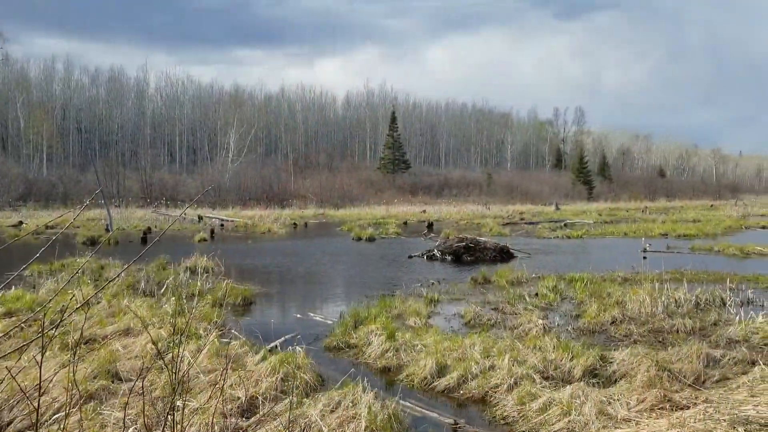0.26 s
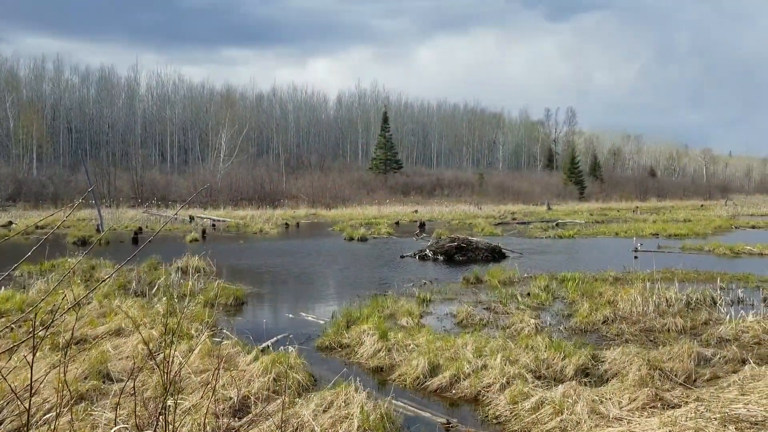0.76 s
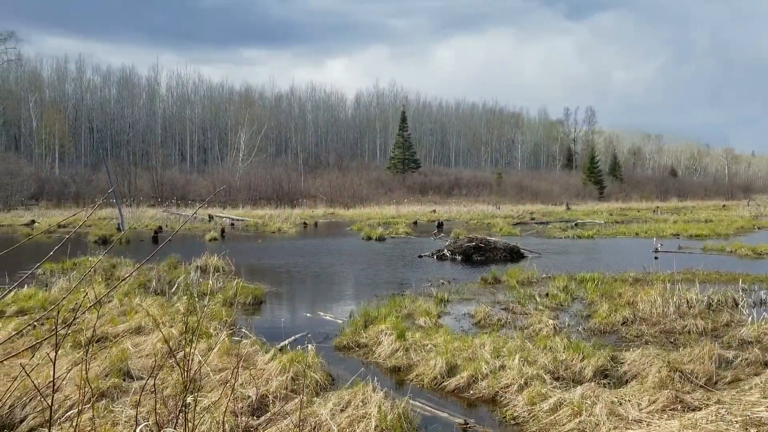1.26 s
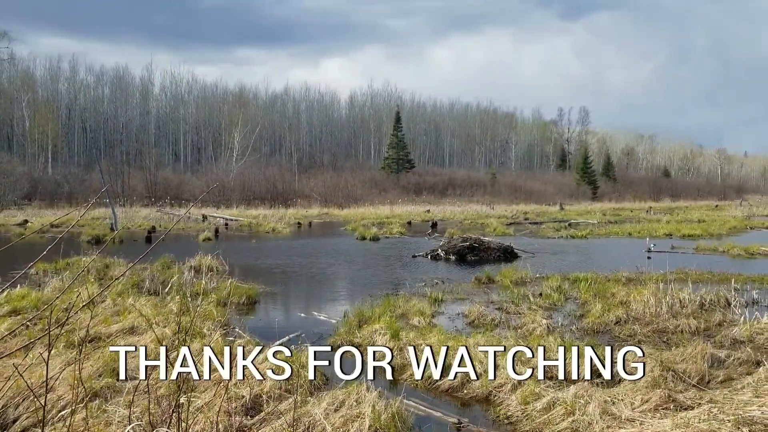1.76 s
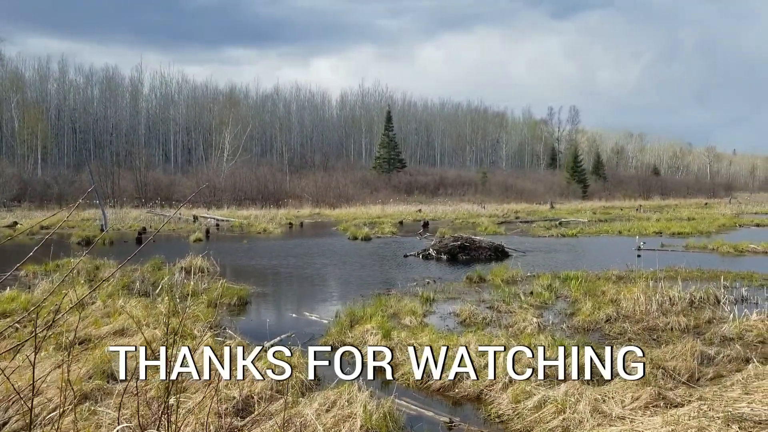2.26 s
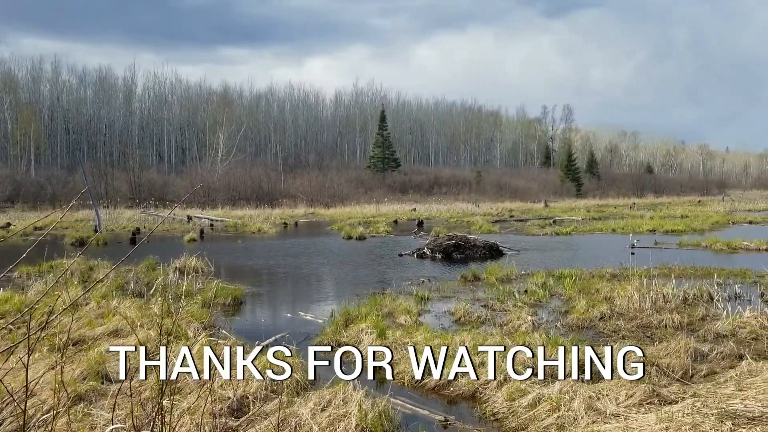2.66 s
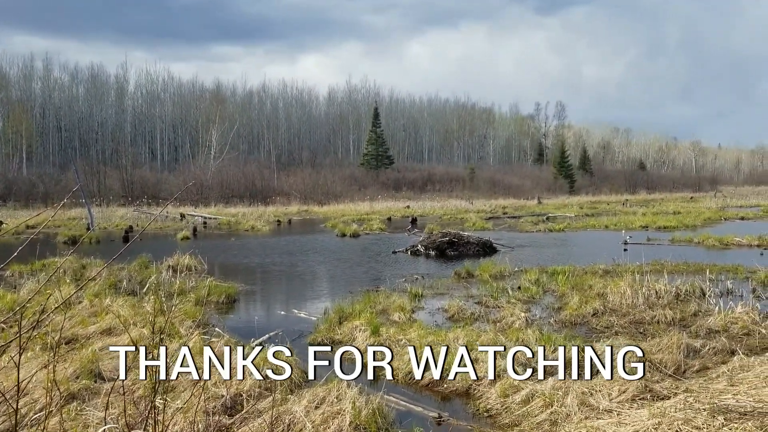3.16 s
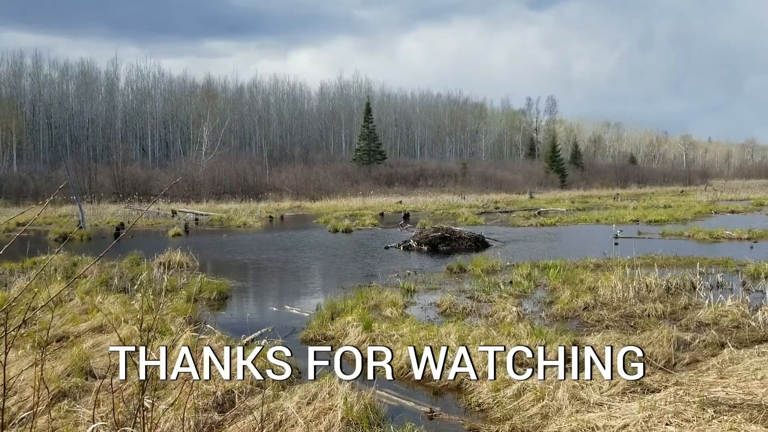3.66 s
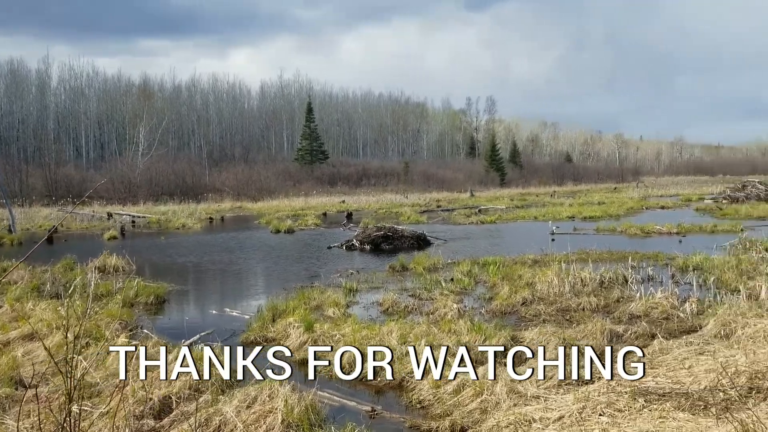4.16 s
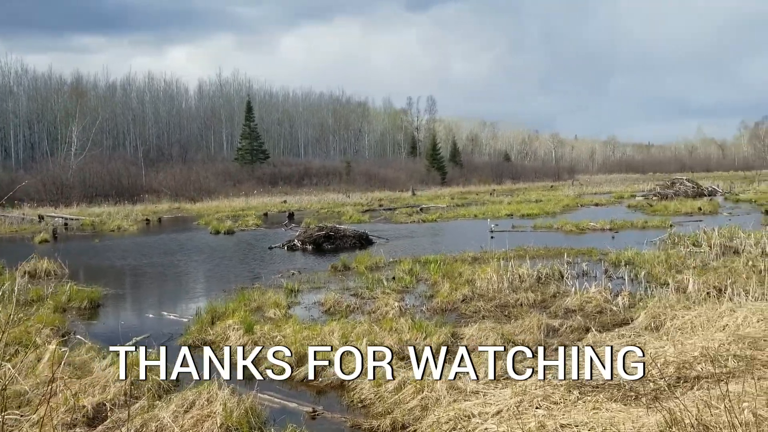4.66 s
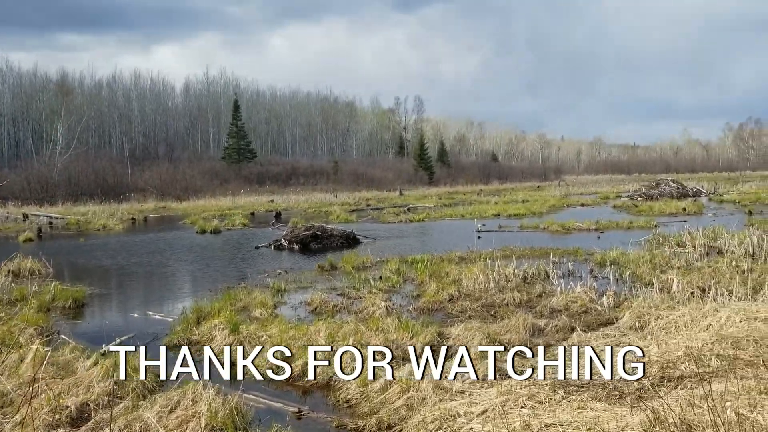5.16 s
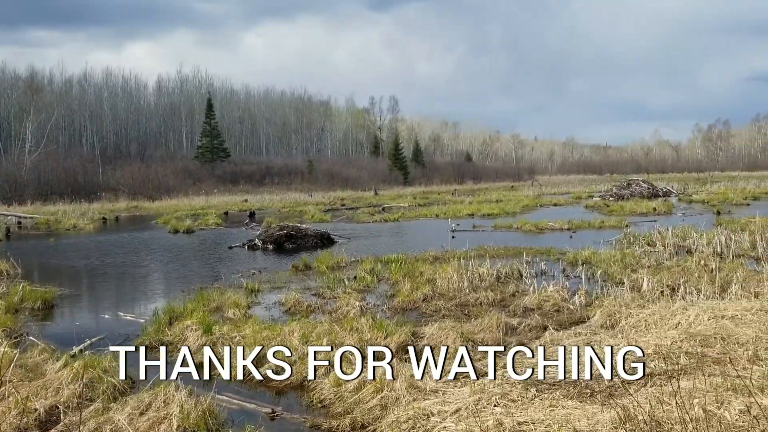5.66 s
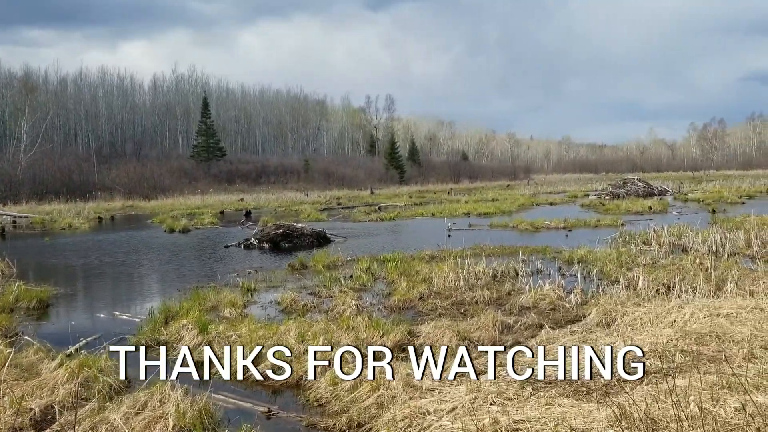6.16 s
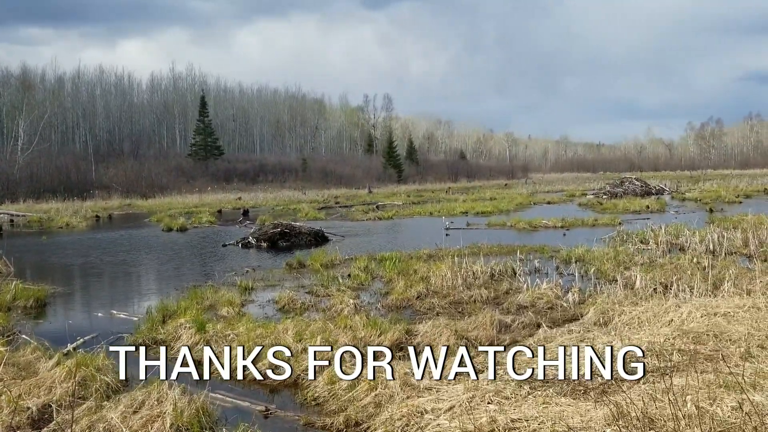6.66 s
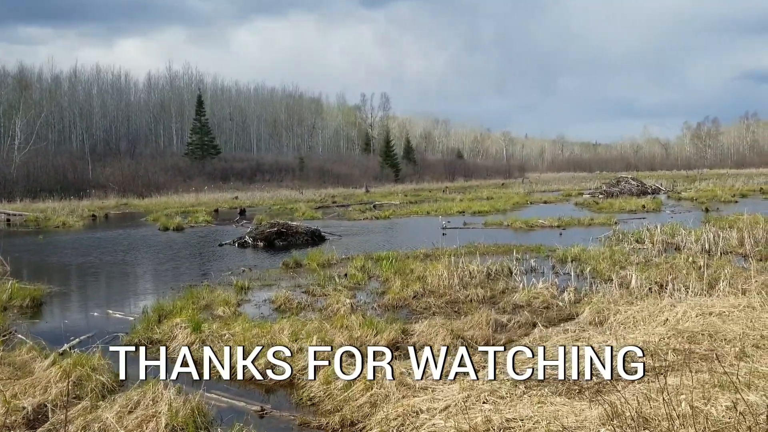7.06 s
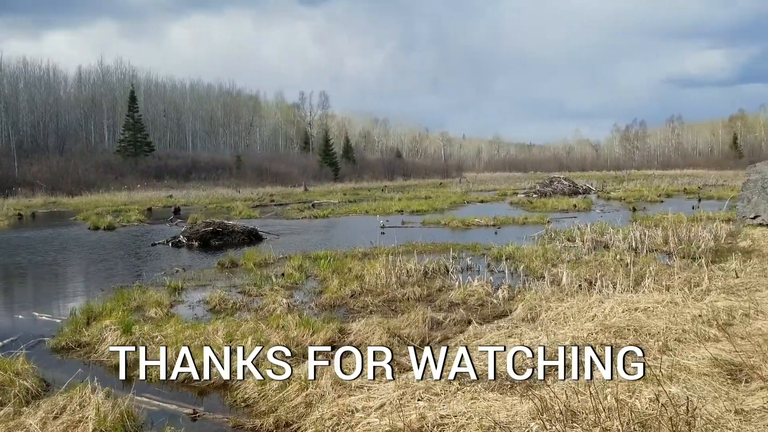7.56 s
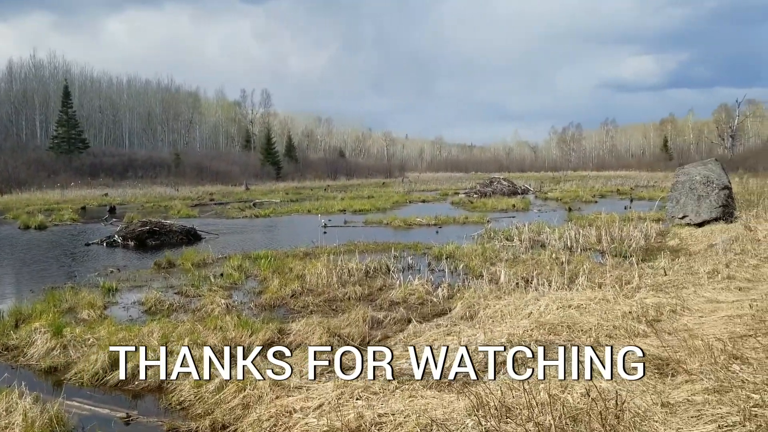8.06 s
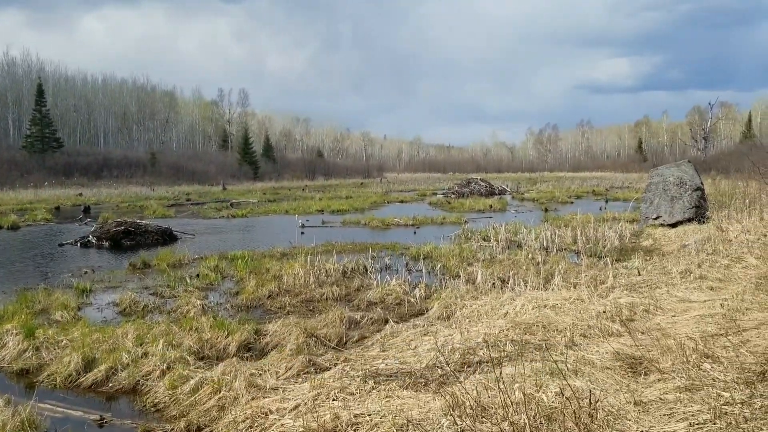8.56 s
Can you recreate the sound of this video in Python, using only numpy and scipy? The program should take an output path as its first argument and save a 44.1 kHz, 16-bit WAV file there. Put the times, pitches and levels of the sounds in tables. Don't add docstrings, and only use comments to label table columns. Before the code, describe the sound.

Dense chorus of tiny tree frogs peeping in high rising whistles over a marsh, with low wind gusts thumping the microphone and dry grass crackling.

```python
import sys
import numpy as np
from scipy import signal
from scipy.fft import rfft, irfft, next_fast_len
from scipy.io import wavfile
from scipy.ndimage import uniform_filter1d, map_coordinates

SR = 44100
rng = np.random.default_rng(int(sys.argv[2]) if len(sys.argv) > 2 else 0)


def volts_from_decibels(level):
    exponent = np.asarray(level, float) / 20
    return 10 ** exponent


def dump(signal):
    limited = np.clip(np.atleast_2d(signal).T, -1, 1)
    pcm = np.round(limited * 32767).astype(np.int16)
    wavfile.write(sys.argv[1], SR, pcm)


N = 389403


def unit(x):
    return x / np.sqrt(np.mean(x ** 2) + 1e-20)


def curves(rows):
    s, *columns = np.transpose(rows)
    return [np.interp(np.arange(N) / SR, s, column) for column in columns]


def wobble(rate):
    knots = rng.standard_normal((2, int(N * rate / SR) + 4))
    position = np.arange(N) * rate / SR
    return np.array([map_coordinates(k, [position]) for k in knots])


def coloured(x, spectrum):
    size = next_fast_len(N + 8192)
    hz, db = np.transpose(spectrum)
    bins_hz = np.fft.rfftfreq(size, 1 / SR)
    gain = volts_from_decibels(np.interp(np.log(bins_hz + 1), np.log(hz + 1), db))
    return unit(irfft(rfft(x, size) * gain, size)[..., :N])


def add_call(out, s, length, start_hz, end_hz, db, lead_us, pulses=0, pan_db=0, twist=0, partials=()):
    t = np.arange(int((length + 0.0073) * SR)) / SR
    u = (t - .004) / length
    bend = 0 if pulses else .3
    glide_hz = start_hz + (end_hz - start_hz) * (u + bend * u * (1 - u))
    turn = 2 * np.pi * np.cumsum(glide_hz) / SR

    attack = np.clip(t / 0.0085, 0, 1)
    release = np.clip((t[-1] - t) / 0.0061, 0, 1)
    shape = attack * release * volts_from_decibels(0.97 * (u + 0.5))
    if pulses:
        beat = pulses * (t + .0015 * np.sin(37 * t + start_hz))
        opening = np.clip(1.7 * (.45 - np.cos(2 * np.pi * beat)), 0, 1.4)
        shape = shape * opening * np.clip(.55 + 2 * u, 0, 1)
    flutter_db = 2.6 * np.interp(t, np.linspace(0, t[-1], 12), rng.standard_normal(12))

    side = np.array([[.5], [-.5]])
    cycles = 1 + lead_us * 1e-6 * (start_hz + end_hz) / 2
    sway = .04 * np.interp(t, np.linspace(0, t[-1], 5), rng.standard_normal(5))
    cycles = cycles + twist * (u - .5) + sway
    phase = turn + rng.uniform(0, 2 * np.pi) + side * 2 * np.pi * cycles
    tone = np.sin(phase) + sum(volts_from_decibels(level) * np.sin(k * phase) for k, level in partials)
    call = np.sqrt(2) * volts_from_decibels(db + side * pan_db) * shape * volts_from_decibels(flutter_db) * tone

    seat = out[:, max(round((s - .004) * SR), 0):][:, :len(t)]
    seat += call[:, :seat.shape[1]]


# start in seconds, length in seconds, start pitch in Hz,
# end pitch in Hz, level in dB.
LOUD_REEDS = [(0.702, 0.168, 2640.0, 3040.0, -37.3), (1.692, 0.18, 2680.0, 3160.0, -37.4),
              (2.371, 0.108, 2600.0, 2960.0, -40.6), (2.566, 0.084, 2760.0, 3080.0, -40.1),
              (3.201, 0.096, 2700.0, 2940.0, -47.8), (3.388, 0.048, 3220.0, 3340.0, -53.7),
              (3.919, 0.168, 2760.0, 3200.0, -42.9), (4.015, 0.18, 2700.0, 3100.0, -48.4),
              (4.302, 0.096, 2660.0, 2940.0, -48.3), (6.126, 0.048, 3100.0, 3260.0, -51.8),
              (7.89, 0.12, 2960.0, 3240.0, -52.2)]
BUSY_REEDS = [(0.004, 0.06, 2880.0, 3080.0, -48.7), (0.104, 0.06, 2920.0, 3040.0, -48.7),
              (0.255, 0.096, 3020.0, 3220.0, -50.4), (0.447, 0.06, 3080.0, 3320.0, -51.6),
              (0.714, 0.084, 2940.0, 3260.0, -48.9), (0.722, 0.12, 2600.0, 2880.0, -46.4),
              (0.81, 0.06, 3020.0, 3140.0, -45.1), (0.846, 0.12, 2620.0, 2900.0, -49.8),
              (1.002, 0.108, 2920.0, 3320.0, -46.9), (1.544, 0.096, 2960.0, 3240.0, -46.9),
              (1.772, 0.072, 2800.0, 3000.0, -44.2), (1.88, 0.12, 2880.0, 3320.0, -45.0),
              (1.892, 0.072, 2640.0, 2840.0, -46.0), (2.291, 0.084, 3000.0, 3160.0, -47.6),
              (2.379, 0.096, 2540.0, 2820.0, -50.2), (2.546, 0.06, 3120.0, 3320.0, -51.4),
              (2.973, 0.06, 2660.0, 2820.0, -51.9), (3.065, 0.084, 2800.0, 3240.0, -47.5),
              (3.257, 0.048, 3200.0, 3360.0, -47.5), (3.572, 0.096, 2720.0, 3040.0, -46.7),
              (3.632, 0.084, 2700.0, 2900.0, -48.1), (3.648, 0.144, 2840.0, 3200.0, -42.2),
              (4.151, 0.168, 2800.0, 3240.0, -47.1), (4.171, 0.06, 2960.0, 3240.0, -48.3),
              (4.282, 0.12, 2780.0, 3180.0, -47.4), (4.282, 0.12, 2680.0, 3080.0, -41.6),
              (4.438, 0.132, 2940.0, 3300.0, -43.4), (4.709, 0.084, 2980.0, 3300.0, -48.4),
              (5.308, 0.084, 2920.0, 3280.0, -46.4), (5.4, 0.156, 3020.0, 3340.0, -49.8),
              (6.066, 0.048, 3140.0, 3300.0, -52.3), (6.733, 0.096, 2980.0, 3260.0, -47.7),
              (7.363, 0.048, 2840.0, 2960.0, -49.5), (8.58, 0.12, 2600.0, 2920.0, -47.0)]
LEFT_REEDS = [(0.838, 0.18, 2720.0, 3080.0, -43.2), (1.006, 0.072, 3160.0, 3320.0, -47.6),
              (1.385, 0.18, 2640.0, 3120.0, -42.3), (1.692, 0.048, 3120.0, 3360.0, -51.2),
              (1.848, 0.132, 2560.0, 3000.0, -40.2), (2.011, 0.12, 2820.0, 3300.0, -44.7),
              (2.111, 0.048, 3100.0, 3260.0, -42.9), (2.47, 0.048, 3120.0, 3320.0, -49.6),
              (2.618, 0.12, 2720.0, 3040.0, -42.8), (2.706, 0.132, 2760.0, 3160.0, -41.8),
              (2.71, 0.132, 2520.0, 2920.0, -46.3), (2.905, 0.096, 2980.0, 3260.0, -46.4),
              (3.049, 0.048, 3100.0, 3260.0, -51.7), (3.644, 0.06, 3080.0, 3240.0, -50.4),
              (4.582, 0.18, 2520.0, 2880.0, -46.5), (5.272, 0.06, 2980.0, 3140.0, -47.8),
              (8.565, 0.108, 2740.0, 3060.0, -43.3), (8.569, 0.18, 2660.0, 3140.0, -38.3)]
RIGHT_REEDS = [(1.568, 0.048, 3160.0, 3280.0, -49.3), (2.482, 0.18, 2800.0, 3320.0, -46.0),
               (2.969, 0.048, 3000.0, 3160.0, -49.1), (3.057, 0.156, 2660.0, 3140.0, -38.4),
               (3.157, 0.048, 2900.0, 3020.0, -45.5), (3.34, 0.096, 2920.0, 3240.0, -46.4),
               (3.36, 0.156, 2640.0, 2920.0, -49.2), (3.755, 0.168, 2780.0, 3340.0, -43.9),
               (3.931, 0.108, 2540.0, 2860.0, -52.6), (4.454, 0.096, 2880.0, 3160.0, -44.4),
               (5.068, 0.12, 2680.0, 3080.0, -39.9), (5.068, 0.12, 2780.0, 3180.0, -43.0),
               (5.448, 0.06, 2760.0, 2920.0, -48.6), (5.747, 0.168, 2660.0, 3100.0, -41.9),
               (5.783, 0.108, 2980.0, 3260.0, -51.5), (6.026, 0.144, 2580.0, 3060.0, -43.8),
               (6.138, 0.06, 2620.0, 2820.0, -47.8), (6.198, 0.18, 2640.0, 3040.0, -45.9),
               (6.362, 0.144, 2760.0, 3160.0, -48.4), (6.876, 0.132, 2740.0, 2980.0, -47.0),
               (7.048, 0.18, 2720.0, 3160.0, -46.3), (7.946, 0.06, 2580.0, 2780.0, -54.2)]
FRONT_REEDS = [(4.446, 0.18, 2540.0, 3100.0, -41.2), (4.941, 0.156, 2800.0, 3320.0, -47.5),
               (5.192, 0.108, 2600.0, 2800.0, -47.4), (5.3, 0.108, 2640.0, 2920.0, -47.5),
               (5.484, 0.168, 2620.0, 3140.0, -40.3), (5.488, 0.156, 2740.0, 3220.0, -45.3),
               (6.082, 0.06, 2700.0, 2860.0, -49.2), (6.106, 0.18, 2600.0, 3160.0, -40.7),
               (6.286, 0.048, 2960.0, 3080.0, -45.3), (6.513, 0.048, 2640.0, 2880.0, -42.8),
               (6.533, 0.156, 2640.0, 3280.0, -42.5), (6.713, 0.084, 3000.0, 3280.0, -52.0),
               (6.733, 0.108, 2600.0, 3120.0, -45.5), (6.912, 0.096, 2640.0, 2880.0, -47.5),
               (7.016, 0.156, 2760.0, 3240.0, -41.6), (7.12, 0.048, 3020.0, 3140.0, -43.3),
               (7.431, 0.096, 2660.0, 2900.0, -49.1), (7.547, 0.156, 2960.0, 3240.0, -49.2),
               (7.687, 0.156, 2700.0, 3180.0, -51.7), (7.926, 0.108, 2720.0, 3040.0, -50.4),
               (8.181, 0.048, 2980.0, 3220.0, -52.6), (8.381, 0.072, 2920.0, 3120.0, -52.9),
               (8.493, 0.084, 2980.0, 3180.0, -51.3)]
FAR_BANK = [(1.497, 0.168, 2620.0, 3100.0, -49.7), (2.007, 0.144, 2640.0, 2960.0, -45.8),
            (3.201, 0.072, 2800.0, 3000.0, -46.1), (5.212, 0.072, 2960.0, 3320.0, -50.0),
            (5.531, 0.168, 2520.0, 3000.0, -47.3), (7.874, 0.144, 2760.0, 3160.0, -41.7),
            (8.545, 0.18, 2900.0, 3220.0, -46.2)]
ISLAND = [(0.403, 0.12, 2680.0, 3080.0, -43.8), (0.435, 0.18, 2560.0, 3160.0, -47.0),
          (1.149, 0.108, 2720.0, 3080.0, -48.9), (1.177, 0.18, 2640.0, 3280.0, -46.8),
          (1.652, 0.108, 2780.0, 3180.0, -48.0), (3.899, 0.072, 2580.0, 2780.0, -54.5),
          (5.783, 0.06, 2660.0, 2780.0, -55.5), (7.447, 0.072, 2860.0, 3100.0, -43.7),
          (7.543, 0.048, 2680.0, 2880.0, -46.2), (7.543, 0.18, 2600.0, 3160.0, -40.8),
          (8.022, 0.144, 2740.0, 3220.0, -43.0)]
SEDGE = [(0.104, 0.144, 2680.0, 3160.0, -49.3), (1.269, 0.108, 2540.0, 2820.0, -51.3),
         (1.281, 0.132, 2780.0, 3260.0, -45.6), (1.297, 0.084, 2720.0, 3000.0, -42.7),
         (2.746, 0.084, 2800.0, 3040.0, -43.2), (3.6, 0.048, 3040.0, 3240.0, -44.7)]
# table of peeps, lead of the left port in microseconds,
# turn of that lead along the glide in cycles, left over right in dB.
CALLERS = [
    (LOUD_REEDS, -134, .18, -1),
    (BUSY_REEDS, -166, -.12, -.3),
    (LEFT_REEDS, 132, .12, 0),
    (RIGHT_REEDS, -104, -.16, .2),
    (FAR_BANK, 172, .7, -.6),
    (FRONT_REEDS, -39, .06, -.4),
    (ISLAND, 46, .14, -1.3),
    (SEDGE, 100, -.47, -.2),
]


def peepers(out):
    partials = [(.5, -46.0), (1.5, -41.5), (2, -48)]
    for peeps, lead_us, twist, pan_db in CALLERS:
        for s, length, hz, end_hz, db in peeps:
            add_call(out, s, length, hz, end_hz, db - 1.25, lead_us,
                     pan_db=pan_db, twist=twist, partials=partials)


# start in seconds, length in seconds, level in dB.
NEAR_PEEPS = [(0.702, 0.12, -49.5), (2.025, 0.092, -48), (2.545, 0.12, -45.5), (3.173, 0.13, -47.5),
              (3.796, 0.13, -48), (4.688, 0.16, -48.5), (5.416, 0.13, -48), (6.003, 0.14, -52),
              (6.584, 0.11, -44.5), (7.405, .14, -47), (8.011, .132, -47.5)]
# multiple of the whistle's frequency, level in dB.
SAC_PARTIALS = [
    (.5, -42),
    (1.5, -30.5),
    (1.52, -39.5),
    (2, -28.5),
]


def near_frog(out):
    start_hz, glide_hz_per_s = 2792, 3620
    for s, length, db in NEAR_PEEPS:
        lead_us = 155 - 8.5 * s
        add_call(out, s, length, start_hz, start_hz + glide_hz_per_s * length, db, lead_us,
                 pan_db=7.0, partials=SAC_PARTIALS)


# start in seconds, level in dB.
HIGH_PEEPS = [(.405, -58.5), (1.035, -48.5), (1.7, -50.5), (2.315, -54), (3.235, -60), (3.875, -54.5),
              (4.6, -58), (5.255, -58)]


def high_frog(out):
    for s, db in HIGH_PEEPS:
        add_call(out, s, 0.077, 3330, 3492, db, lead_us=81 + 33.4 * s)


# start in seconds,
# length in seconds, start pitch in Hz, end pitch in Hz, level in dB.
TRILLS = [
    (28, [(1.026, .12, 2520, 2700, -66), (2.222, .12, 3217, 3330, -58), (3.811, 0.18, 2440, 2690, -63), (4.688, .1, 3180, 3280, -56.5), (4.841, 0.25, 3030, 3297, -53), (7.261, 0.19, 3086, 3316, -57)]),
    (32, [(.386, 0.23, 2540, 2870, -46), (2.155, 0.32, 2764, 3190, -52.5), (4.918, .16, 2890, 3262, -47.5), (6.365, 0.2, 3110, 3330, -58), (7.114, .2, 2520, 2830, -51)]),
    (35, [(.158, 0.26, 2460, 2560, -59.5), (2.708, 0.34, 2540, 2860, -60), (4.575, 0.22, 2587, 2817, -44.5), (5.538, 0.32, 2550, 2810, -58.5), (6.896, 0.19, 2460, 2550, -51), (7.561, 0.26, 2696, 2980, -59), (8.014, 0.28, 2615, 2770, -57)]),
    (38.5, [(.208, 0.21, 2780, 2954, -50), (2.007, 0.154, 2800, 2900, -47), (4.334, .22, 2410, 2580, -56), (5.062, .12, 2690, 2735, -47), (5.184, .25, 2710, 2922, -49)]),
    (42, [(3.395, 0.25, 2638, 2935, -46), (3.958, 0.25, 2660, 3100, -56), (5.924, 0.092, 2770, 2780, -60), (6.723, 0.22, 2700, 2790, -50), (8.286, 0.15, 2664, 2920, -49.5)]),
]
# time in seconds, lead of the left port in microseconds.
TRILL_BEARING = [(4.4, -140), (4.8, 10), (6.8, 10), (6.88, -150), (7.2, -150), (7.25, 50)]


def trillers(out):
    for pulses, trills in TRILLS:
        for s, length, hz, end_hz, db in trills:
            lead_us = np.interp(s, *np.transpose(TRILL_BEARING))
            add_call(out, s, length, hz, end_hz, db, lead_us, pulses=pulses)


# start in seconds, length in seconds, pitch in Hz, level in dB,
# pulses per second (the sign only sets the beat's direction).
CROAKS = [(1.69, 0.067, 1755, -75, -6), (2.76, 0.084, 1765, -66, 1), (3.37, 0.18, 1840, -66.5, 61),
          (6.58, 0.053, 1760, -70, -2.5), (7.05, 0.12, 2080, -59.5, 28), (7.9, .05, 1770, -75.5, 0.5),
          (8.39, 0.1, 2055, -61, 37.5), (8.53, .03, 2130, -61, -0.5), (8.728, 0.011, 2020, -57, 0),
          (7.515, 0.012, 1990, -59, 0), (8.09, .03, 2050, -58, 0.5)]


def croakers(out):
    for s, length, hz, db, pulses in CROAKS:
        add_call(out, s, length, hz, hz, db, 260, pulses=pulses, partials=[(1.04, -4), (.95, -6)])


def frogs():
    out = np.zeros((2, N))
    for voice in (peepers, high_frog, near_frog, trillers, croakers):
        voice(out)
    return out


# time in seconds, level in dB.
CROWD_LEVEL = [(0.0, -54), (1.28, -49), (2.6, -48), (4.03, -52), (5.19, -49.5), (5.75, -53), (7.0, -50.5),
               (8.83, -50.5)]


def crowd(count=360):
    out = np.zeros((2, N))
    for when, low, high, place, distance, kind in rng.random((count, 6)):
        trill = kind < .4
        length = .22 if trill else 0.083 + 0.04915 * high
        start_hz = 2450 + 600 * (low + high) / 2
        end_hz = start_hz + 280 + 140 * place
        lead_us = 340 * (place - .5) + 170
        add_call(out, when * N / SR, length, start_hz, end_hz, -11 * distance - 4 * trill, lead_us,
                 pulses=trill * (30 + 25 * kind), partials=[(0.55, -29.5)])
    level_db = curves(CROWD_LEVEL)[0] + .3
    return volts_from_decibels(level_db) * unit(out + volts_from_decibels(12) * marsh(out))


def marsh(x):
    t = np.arange(SR // 2) / SR
    tail = rng.standard_normal((2, len(t))) * volts_from_decibels(-60 * t / 0.53)
    tail = tail / np.linalg.norm(tail[0])
    return volts_from_decibels(-14) * signal.fftconvolve(x, tail, axes=1)[:, :N]


# frequency in Hz, level in dB per Hz.
BUFFET = [(12, -37), (20, -18.5), (59, -0.5), (135, -7), (225, -14.5), (352, -26), (433, -31.5), (709, -58),
          (900, -69.5), (1170, -92), (1980, -120)]


def wind():
    level_db = wind_db()
    lumps = volts_from_decibels(1.1 * wobble(19) + 3.6 * wobble(35)[0] + 5.3 * wobble(70))
    lumps = lumps / np.sqrt(np.abs(uniform_filter1d(np.mean(lumps ** 2, 0), SR // 12)))

    noise = rng.standard_normal((3, N))
    shared_eddy = np.array([noise[2], np.roll(noise[2], shift=105)])
    push = coloured(lumps * (noise[:2] + 0.84 * shared_eddy), BUFFET)
    power = np.mean(push, 0) ** 2 + 0.27 * np.mean(push ** 2, 0)
    push = push / np.sqrt(np.abs(uniform_filter1d(power, SR // 16)) + 0.086)
    push = push / (1 + (push / 3.6) ** 4) ** .25

    thump = signal.sosfilt(signal.butter(N=2, Wn=110, fs=SR, output="sos"), push)
    strength = np.clip((level_db + 65.0) / 26, 0, 1)
    port_db = np.array([[.2], [1.1]])
    return volts_from_decibels(level_db + port_db) * (strength * push + (1 - strength) * unit(thump))


def swell(s, hold, db, rise, fall):
    t = np.arange(0, N, 32) / SR
    below_db = rise * np.maximum(s - t, 0) + fall * np.maximum(t - s - hold, 0)
    return volts_from_decibels(2 * (db - below_db))


# start in seconds, hold in seconds, level in dB.
GUSTS = [(0.0, 0.31, -41), (0.306, 0.3, -33.5), (0.717, 0.72, -40.5), (1.494, 0.26, -50), (1.93, 0.1, -56),
         (3.32, 0.05, -40), (3.515, 0.53, -40.5), (4.177, 0.37, -57.5), (4.903, 0.23, -42),
         (5.572, 0.82, -60), (5.843, 0.35, -41.5), (6.266, 0.35, -48.5), (6.87, 0.36, -52),
         (7.316, 0.16, -62.5), (8.303, 0.8, -69.5)]
# time in seconds, peak in dB.
SLAPS = [(0.048, -36), (.18, -28), (0.329, -26.5), (.56, -41), (.62, -34), (0.779, -38), (0.89, -21.5),
         (1.201, -37), (1.371, -36), (1.53, -43), (1.899, -44), (3.324, -30.5), (3.423, -20.5),
         (3.533, -29), (3.681, -37), (3.809, -28), (3.928, -24.5), (4.048, -25.5), (4.22, -52),
         (4.36, -49.5), (4.49, -47.5), (4.913, -38), (5.01, -41), (5.771, -48.5), (5.941, -32.5),
         (6.139, -30.5), (6.349, -44.5), (6.6, -47), (8.27, -52.5), (8.79, -50)]


def wind_db():
    power = volts_from_decibels(2 * -72.5)
    power = power + sum(swell(*gust, rise=651, fall=113.5) for gust in GUSTS)
    power = power + sum(swell(s, 0, db, rise=377.5, fall=383.5) for s, db in SLAPS)
    return np.interp(np.arange(N), np.arange(0, N, 32), 10 * np.log10(power))


# time in seconds, level in dB.
RUSTLE = [(0.0, -69.5), (0.91, -66), (1.18, -59.5), (1.4, -64.5), (2.02, -69), (2.09, -63.5), (2.51, -69),
          (6.93, -70.5), (7.03, -62), (7.28, -71.5), (8.83, -71.5)]
# time in seconds, peak in dB.
SNAPS = [(0.6295, -62), (0.6814, -65), (0.969, -42), (1.037, -62), (1.1009, -41), (1.1777, -54),
         (1.3483, -45), (1.8986, -47), (2.0413, -55), (2.073, -39), (2.109, -38.5), (2.1545, -39),
         (2.1685, -60), (2.258, -40), (2.309, -49), (2.39, -41), (2.6658, -56), (3.688, -52), (3.9075, -56),
         (4.247, -56), (4.439, -39), (4.591, -58), (4.939, -45.5), (4.956, -43), (5.027, -46), (5.148, -47),
         (5.1954, -57), (5.9893, -61), (6.9676, -63), (7.01, -41), (7.0866, -43)]
# frequency in Hz, level in dB per Hz.
GRASS_HISS = [(2120, -34.5), (3600, 0.5), (3710, -11.5), (3950, -6), (4380, -6), (5110, -9.5), (6180, -6),
              (7070, -12), (8660, -23.5), (9790, -20), (11300, -8.5), (15100, -0.5), (15600, -2.5)]


def grass():
    level_db = curves(RUSTLE)[0]
    stir = np.clip((level_db + 84.5) / 10, .15, 1)
    grains = volts_from_decibels(stir * (1.3 * wobble(40)[0] + 1.9 * wobble(400)))
    grains = grains / np.sqrt(np.abs(uniform_filter1d(grains ** 2, SR // 5)))
    level = volts_from_decibels(level_db + 6.0) * grains

    t = np.arange(SR // 20) / SR
    decay = volts_from_decibels(-60 * t / 0.0096) + 0.47 * volts_from_decibels(-60 * t / 0.12)
    snap = np.zeros((2, N))
    for s, db in SNAPS:
        snap[:, round(s * SR):][:, :len(t)] += volts_from_decibels(db - 11.5) * decay

    hiss = coloured(rng.standard_normal((2, N)), GRASS_HISS)
    hiss = hiss * volts_from_decibels([[-.8], [.8]])
    bright = unit(np.gradient(hiss, axis=1) + 0.28 * hiss)
    return level * hiss + snap * bright


# frequency in Hz, level in dB per Hz.
FOREST_AIR = [(59, -30), (100, -4.5), (212, -4), (406, 2), (908, -15.5), (1520, -15.5), (1730, -20),
              (2350, -6.5), (3060, -33), (5170, -120)]


def forest():
    noise = rng.standard_normal((3, N))
    swell_db = 1.2 * wobble(4) + 1.5 * wobble(30)
    return volts_from_decibels(-68.5 + swell_db) * coloured(noise[:2] + 0.8 * noise[2], FOREST_AIR)


def scene():
    chorus = frogs()
    return chorus + marsh(chorus) + crowd() + wind() + grass() + forest()


FAINT_EDGES_HZ = [3410, 3600, 3790, 4130, 4300]


def drop_masked(dry):
    hz, _, z = signal.stft(dry, SR, nperseg=2048)
    power = np.abs(z) ** 2
    whistle = power[:, (hz > 2950) & (hz < FAINT_EDGES_HZ[0])].sum(1)
    for low_hz, high_hz in zip(FAINT_EDGES_HZ, FAINT_EDGES_HZ[1:]):
        band = (hz > low_hz) & (hz <= high_hz)
        share = power[:, band].sum(1) / uniform_filter1d(whistle, size=3)
        z[:, band] *= (share > np.quantile(share, .52))[:, None]
    z[:, hz > 15830] = 0
    return signal.istft(z, SR, nperseg=2048)[1][:, :N]


def low_pass(x):
    return signal.sosfilt(signal.butter(12, 16520, fs=SR, output="sos"), x)


def record(dry):
    mix = drop_masked(dry)
    return low_pass(mix)


dry = scene()
out = record(dry)
dump(out)
```